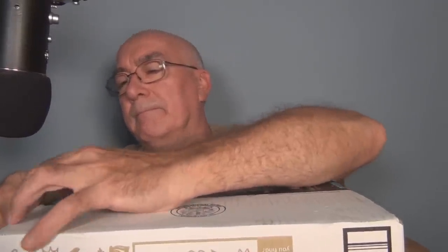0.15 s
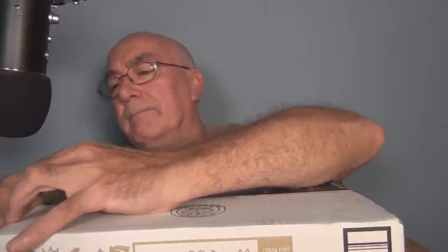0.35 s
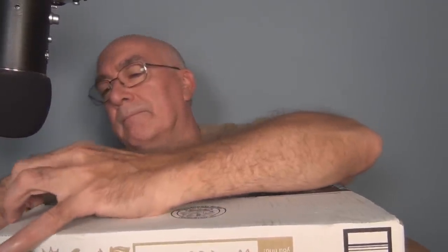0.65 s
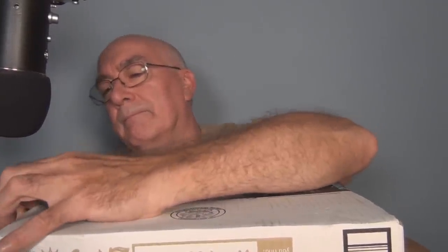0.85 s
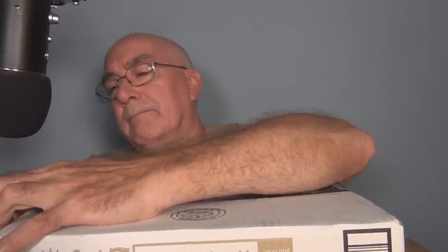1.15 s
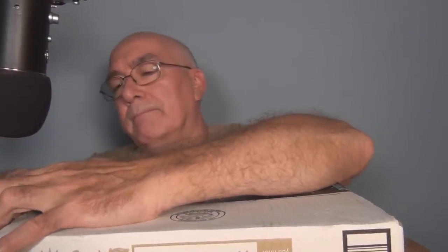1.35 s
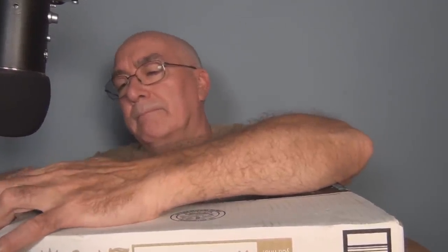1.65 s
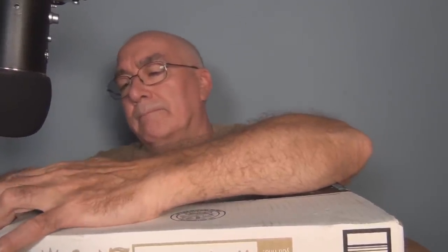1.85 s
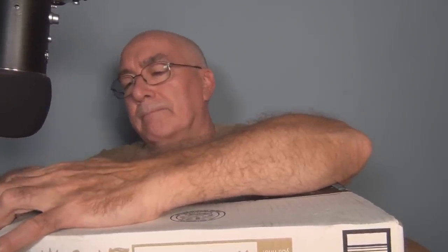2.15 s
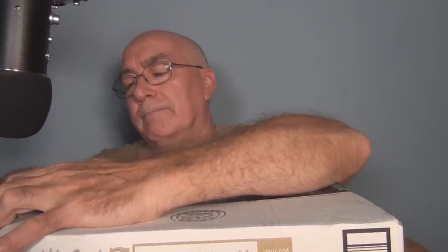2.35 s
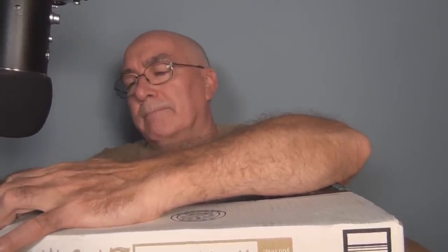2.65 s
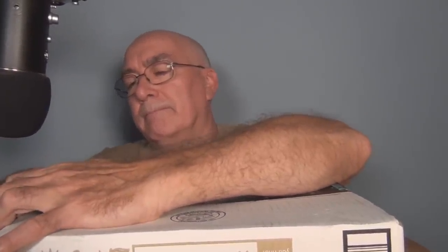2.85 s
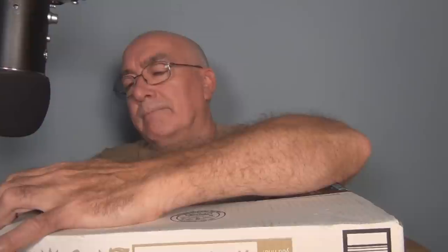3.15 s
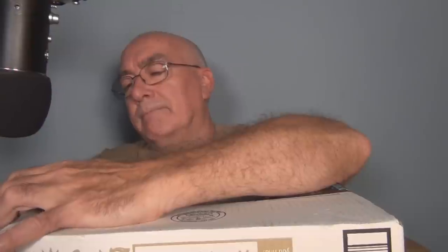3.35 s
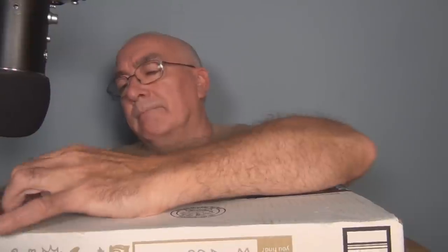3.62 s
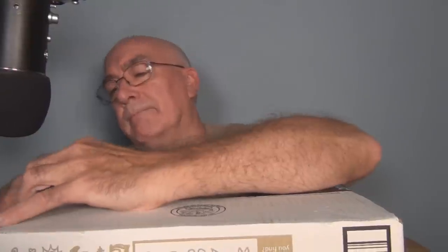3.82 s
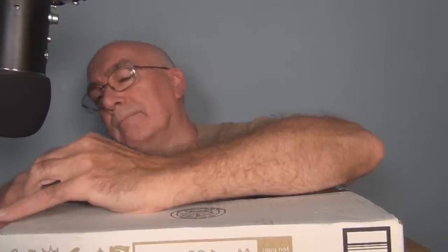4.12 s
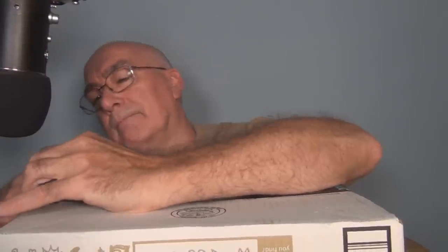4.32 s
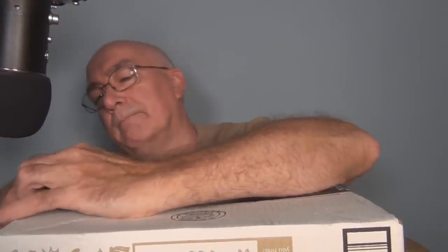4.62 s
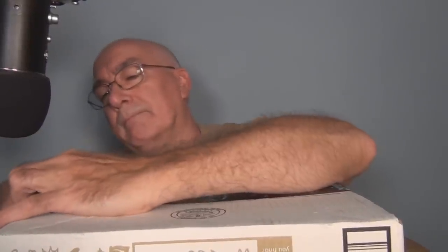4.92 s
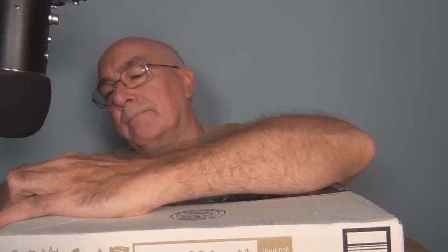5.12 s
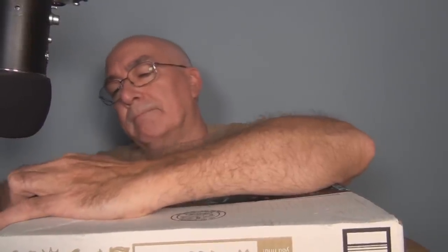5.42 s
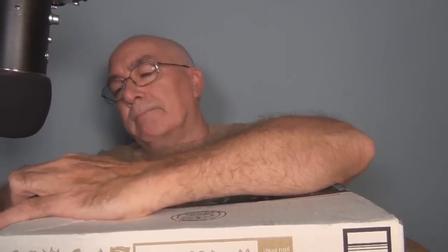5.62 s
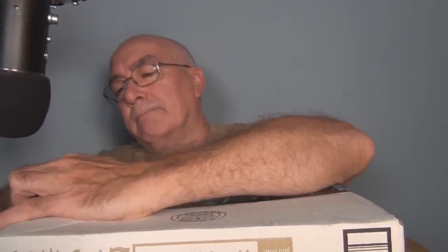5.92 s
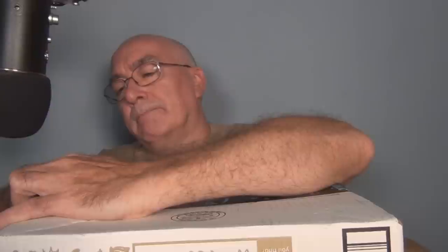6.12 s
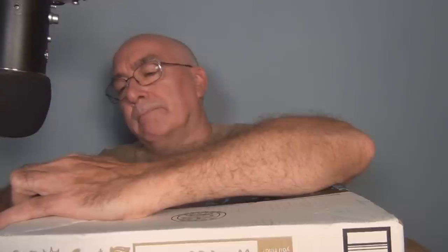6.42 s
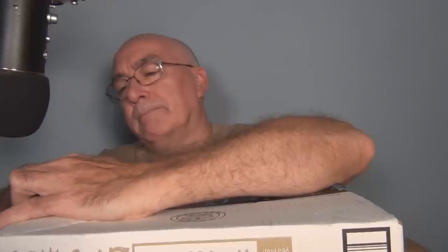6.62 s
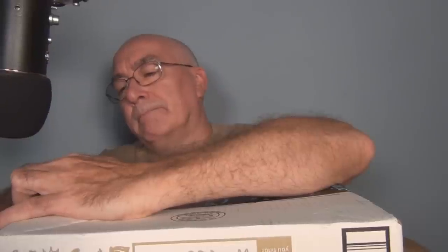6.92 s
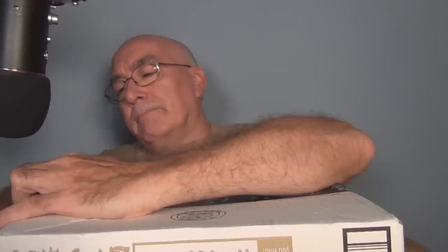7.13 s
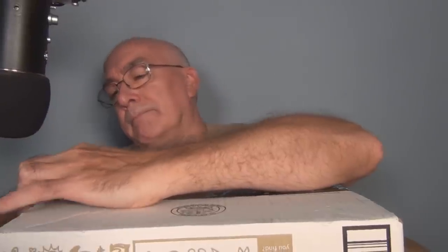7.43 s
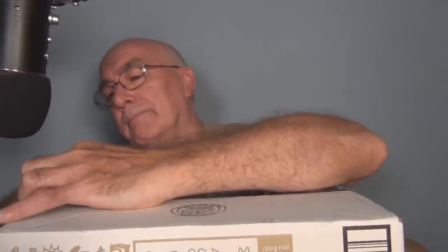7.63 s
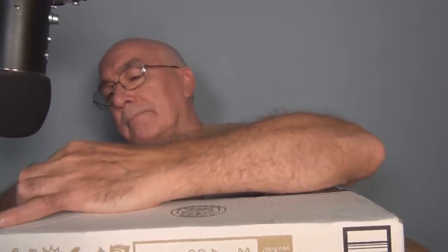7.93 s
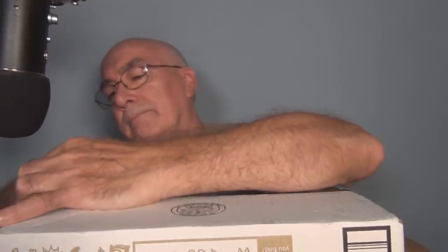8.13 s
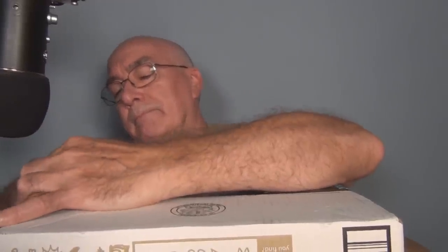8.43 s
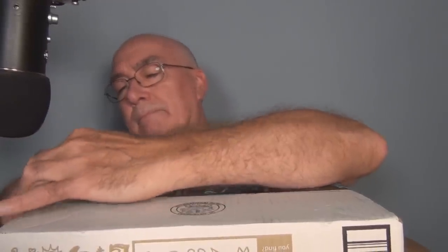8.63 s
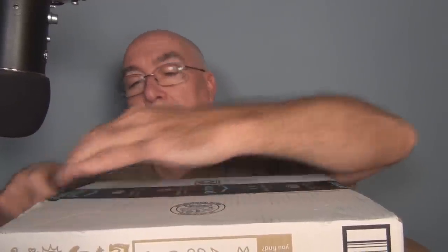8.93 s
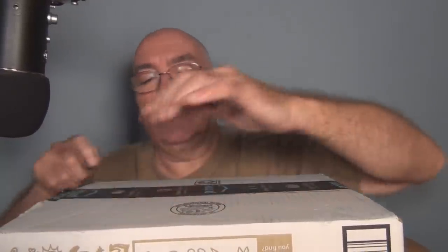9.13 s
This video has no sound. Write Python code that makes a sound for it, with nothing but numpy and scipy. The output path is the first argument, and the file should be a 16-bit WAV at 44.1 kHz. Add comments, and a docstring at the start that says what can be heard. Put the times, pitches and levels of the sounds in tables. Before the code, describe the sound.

Fingers tap and scratch lightly on a hollow cardboard box, until the lid creaks and buckles with one loud pop.

```python
"""A cardboard box, tapped and scratched by a hand, close to a microphone in a quiet room.
Finger knocks ring the hollow lid; nails tick, scrape and rasp on its paper liner; skin sticks
and slips in squeaks and judders; the resting forearm shifts and makes the box rumble.
Near the end the lid creaks harder and harder under the arm, then buckles with one loud pop."""
import sys
import numpy as np
from scipy import signal
from scipy.fft import rfft, irfft, next_fast_len
from scipy.io import wavfile

SR = 44100
rng = np.random.default_rng(int(sys.argv[2]) if len(sys.argv) > 2 else 0)


def transcribe(signal):
    """Save signal, clipped to [-1, 1], as a 16-bit WAV file at the path in sys.argv[1]."""
    frames = np.atleast_2d(signal).T
    limited = np.clip(frames, -1, 1)
    pcm = np.round(limited * 32767).astype(np.int16)
    wavfile.write(sys.argv[1], SR, pcm)


N = 408807
FIR_LEN = 4096
HZ = np.fft.rfftfreq(FIR_LEN, 1 / SR) + 1
BAND_LIMIT_HZ = 16300
POP_S, LIFT_OFF_S = 8.1443, 8.97

# room noise and microphone hiss: freq_hz, gain_db
FLOOR_EQ = [(22, 1), (50, -8), (105, -4), (170, -16.5), (260, -12), (600, -24), (1500, -29), (5000, -39.5),
            (15000, -42.5)]
# resonances of the box's air, lid and paper skin: freq_hz, width_hz, level_db
BOX_MODES = [(73.36,100,-2.5), (107,17,-3.5), (155.89,65,-5), (210,27,-3), (257,52,0), (320.86,29,-7.5),
             (405.2,38.686,0), (465.66,44,-6.5), (756,249.55,-11.5), (1010,520,-21), (1580,310,-22.5),
             (2050,180,-27), (2450,300,-23.5), (4010,260,-21.5), (6000,8800,-22.5)]
# resonances of the paper liner: freq_hz, width_hz, lift_db
LINER_MODES = [(1580, 190, 3.5), (2430, 87, 3), (2700, 110, 5), (3210, 230, 2.5), (5090, 250, 6.5),
               (6380, 450, 6.5), (7070, 390, 5), (9830, 720, 4.5), (12500, 610, 3)]
# finger strokes: peak_s, swell_s, fade_s, scrape_db, drag_db
FINGER_STROKES = [(0.11, 0.16, 0.44, -59.5, -54.5), (0.44, 0.13, 0.3, -60.5, -56),
                  (0.82, 0.08, 0.08, -58, -42.5), (1.099, 0.32, 0.21, -67, -43.5),
                  (1.43, 0.15, 0.17, -58, -42.5), (1.717, 0.10564, 0.12295, -49.5, -41.5),
                  (1.954, 0.13, 0.039, -52.5, -42), (2.16, 0.14, 0.059, -62.5, -48.5),
                  (2.488, 0.09, 0.043, -52, -48.5), (2.644, 0.041, 0.037, -44.5, -47),
                  (2.862, 0.0888, 0.11192, -56.5, -47.5), (3.023, 0.05, 0.025, -59.5, -44),
                  (3.229, 0.12, 0.18634, -51, -42), (3.41, 0.08054, 0.094, -53.5, -44),
                  (3.54, 0.066, 0.047, -53, -44.5), (3.678, 0.076, 0.098, -52.5, -41),
                  (3.92, 0.69, 0.079, -57.5, -73.5), (4.139, 0.034, 0.082, -58, -58.5),
                  (4.31, 0.05, 0.027, -60, -46.5), (4.41, 0.031, 0.1523, -59.5, -52),
                  (4.55, 0.05884, 0.075, -64, -42), (4.68, 0.076, 0.09, -55.5, -54.5),
                  (4.94, 0.14, 0.19, -61, -44.5), (5.14, 0.048, 0.18, -56, -45),
                  (5.341, 0.051, 0.031, -52.5, -42), (5.504, 0.095, 0.06, -46, -41.5),
                  (5.67, 0.065, 0.041, -55, -47.5), (5.801, 0.028, 0.0728, -46, -42),
                  (5.85, 0.062, 0.069, -42.5, -38.5), (6.177, 0.04112, 0.096, -48.5, -46),
                  (6.32, 0.095, 0.034, -51.5, -46), (6.44, 0.051, 0.11977, -51, -41),
                  (6.708, 0.089, 0.078, -42.5, -36), (6.87, 0.063, 0.0408, -58, -44.5),
                  (7.006, 0.04, 0.0535, -44.5, -38), (7.203, 0.026, 0.045, -50, -38.5),
                  (7.42, 0.32, 0.21, -59.5, -49), (7.83, 0.073, 0.11, -60.5, -43.5),
                  (8.12, 0.34, 0.9, -60, -48.5), (8.73, 0.023, 0.0674, -51, -46.5),
                  (8.8, 0.021, 0.033, -50.5, -43.5), (8.951, 0.082, 0.03, -52.5, -47.5)]
# nail on paper: freq_hz, gain_db
SCRAPE_EQ = [(300, -22.5), (660, 9), (1050, 7), (2550, 2), (3000, -0.5), (4000, -0.5), (5100, -2.5),
             (6500, -3), (8200, -1.5), (9900, -4.5), (11300, -5.5), (15000, -8)]
# force of dragging skin: freq_hz, gain_db
DRAG_EQ = [(50, -18), (130, 0.5), (280, -1), (400, -2), (540, 5.5), (800, -2.5), (1200, -2), (1600, 1),
           (2200, -8), (8000, -22)]
# forearm weight shifts: peak_s, swell_s, fade_s, level_db
ARM_SHIFTS = [(0.79, 0.09, 0.12, -35.5), (1.12, 0.19, 0.22, -44.5), (6.44, 0.045, 0.096, -43),
              (8.1, 0.19, 0.21, -34.5)]
# force of the shifting arm: freq_hz, gain_db
ARM_EQ = [(25, 9.5), (70, -5), (105, 6.5), (180, -6), (300, -21.5), (900, -27)]
# nail ticks: start_s, level_db, pitch_hz
NAIL_TICKS = [(1.9577, -19.5, 7613), (2.13, -29, 7258), (2.2426, -28.5, 7327), (2.3089, -28.5, 7240),
              (3.3938, -18, 9174), (4.963, -28.5, 5200), (5.1024, -18, 5000), (6.236, -26.5, 7492),
              (7.048, -19.5, 10400), (7.1385, -18, 10800), (7.1528, -24.5, 10900), (9.2082, -27, 5410)]
# finger knocks: start_s, force_db, weight_db, hardness_db, spot_hz
FINGER_KNOCKS = [(0.352, 4.5, -1, 2, 1110), (0.432, 0.5, -29, 8.5, 880), (0.57, 0, -12, 8, 799),
                 (0.629, 6.5, -6, 1, 1247), (0.652, -2, 20.5, 3, 251.8), (0.8192, 19.5, 3.5, 0.5, 855.9),
                 (0.89, 12, -14.5, -7.5, 1250), (0.996, -0.5, -11, 5, 899), (1.084, 13.5, -18, -4, 1185),
                 (1.203, 4.5, 1.5, 3.5, 799), (1.4392, 29, 2, 4.5, 258), (1.4584, 27, -3, -4, 300),
                 (1.6566, 13.5, 3, 5, 2900), (1.663, 24, -1, -6.5, 319.9), (2.42, 4.5, -1, 1, 373.1),
                 (3.205, 12.5, 3.5, 4.5, 2940), (3.248, 9, 7, -11, 268.5), (3.659, 15, -30, 4, 392.9),
                 (3.663, 18.5, 5, 9.5, 5300), (3.845, 7, 14, -0.5, 338), (4.119, -2.5, 7, 8.5, 366),
                 (4.251, 0, -17, -1, 480.5), (4.402, 5.5, 4, -0.5, 1000), (4.544, 1.5, 14, 3, 420),
                 (4.771, 10, -17, -4.5, 620), (4.962, 5.5, -2.5, 7, 465), (5.132, 5.5, 13.5, 0, 699),
                 (7.371, 4, 9, 8.5, 1605), (7.439, 10.5, -5, 8, 497), (7.482, 0, 14, 4.5, 250.7),
                 (8.371, -0.5, 0, -15, 447), (8.73, 4, 8, 12.5, 2720), (8.753, 6, 2, 3, 286)]
# lone creaks as the hand settles: start_s
LIGHT_CREAKS_S = [0.465, 0.497, 0.595, 0.728, 0.742, 0.9, 0.913, 5.171, 7.92]
# creaks leading to the pop: start_s
LOADED_CREAKS_S = [7.973, 8.006, 8.022, 8.039, 8.062, 8.073, 8.097, 8.116]
# force of a creak: freq_hz, gain_db
CREAK_EQ = [(70, 9.5), (150, 7), (300, 1.5), (420, 3.5), (600, 0), (1200, -3), (1620, 5), (2300, -12.5),
            (6300, -14)]
# pushes with the heel of the hand: start_s, rise_s, level_db, pitch_hz
HEEL_THUMPS = [(0.753, 0.023, -37, 71), (4.404, .009, -31.5, 77), (8.752, 0.0034, -28, 72)]
# skin squeaks: centre_s, length_s, level_db, pitch_hz
SKIN_SQUEAKS = [(1.731, 0.044, -47, 2550), (4.883, 0.06877, -50, 3200), (5.106, 0.043, -47.5, 2070),
                (6.535, 0.11, -50.5, 2060), (8.804, 0.02162, -45.5, 2500)]
# fingertip judders: centre_s, length_s, level_db, first_hz, last_hz, lowpass_hz
FINGER_JUDDERS = [(2.643, 0.088, -43.5, 241.4, 272, 150), (2.819, 0.059, -40.5, 214, 301, 100),
                  (6.625, 0.083, -41.5, 199, 399, 1900)]
# nail digging in: peak_s, swell_s, fade_s, level_db
NAIL_RASPS = [(5.509, .004, 0.014, -32.5), (5.516, 0.0043, 0.022, -31.5), (5.831, 0.0046, 0.011, -29.5),
              (5.839, 0.0055, 0.027, -29.5), (6.671, .004, .007, -33), (6.687, 0.0047, 0.0098, -36.5),
              (6.707, .005, 0.016, -32.5)]
# chattering nail: freq_hz, gain_db
RASP_EQ = [(50, -1), (140, 19.5), (250, 18.5), (330, 5), (430, 12), (660, 16), (1000, 0.5), (1600, 4),
           (4000, -9), (10000, -9.5), (15000, -14)]
# force of the buckling lid: freq_hz, gain_db
POP_EQ = [(80, 36), (160, 33), (255, 43), (400, 35.5), (750, 46.9), (1000, 51.2), (1200, 38), (1600, 51.3),
          (2000, 41.4), (2600, 44.8), (3900, 30), (5200, 37.6), (7000, 39.5), (8500, 31), (12000, 29)]
# reverb decay: freq_hz, t60_s
ROOM_DECAY = [(100, 0.36), (500, 0.22), (6000, 0.33), (10000, 0.06), (15000, 0.2)]
# reverb colour: freq_hz, gain_db
ROOM_EQ = [(80, -15.5), (250, -18.5), (620, -12), (950, -16.5), (1300, -12), (1650, -13), (2200, -11),
           (6000, -16), (14000, -14)]


def amp(db):
    """Decibels to amplitude."""
    return 10 ** (np.asarray(db) / 20)


def unit_rms(x):
    """Scale to rms 1."""
    return x / np.sqrt(np.mean(x ** 2) + 1e-20)


def curve(points, hz=HZ):
    """Interpolate (freq_hz, value) points over log frequency."""
    freq_hz, value = np.transpose(points)
    return np.interp(np.log(hz + 1), np.log(freq_hz), value)


def add(mix, start_s, sound):
    """Mix a sound in at start_s."""
    part = mix[max(round(start_s * SR), 0):][:len(sound)]
    part += sound[:len(part)]


def impulse_response(eq_db):
    """Minimum-phase response of a spectrum."""
    log_gain = np.log(amp(np.maximum(eq_db, -100)))
    mirrored = np.r_[log_gain, log_gain[-2:0:-1]]
    return np.fft.ifft(np.exp(np.conj(signal.hilbert(mirrored)))).real


def coloured(x, eq_db, band_hz):
    """Filter by eq_db; scale to rms 1 within band_hz."""
    y = signal.oaconvolve(x, impulse_response(eq_db))[:N]
    in_band = signal.sosfilt(signal.butter(4, band_hz, "bandpass", fs=SR, output="sos"), y)
    return y / in_band.std()


def wander(rate_hz):
    """Random drift of rms 1."""
    knots = rng.standard_normal(N // 32)
    return unit_rms(np.interp(np.arange(N) * rate_hz / SR, np.arange(len(knots)), knots))


def box_db(damping=1):
    """Box resonances; pressing the lid damps and widens them."""
    power = sum(amp(db) ** 2 / (1 + ((HZ ** 2 - hz ** 2) / (HZ * width_hz * damping)) ** 2) ** 1.5
                for hz, width_hz, db in BOX_MODES)
    return 10 * np.log10(power)


def liner_db(detune=0, spread_db=0):
    """Lift from the liner's resonances, scattered by the place touched."""
    scatter = rng.standard_normal((len(LINER_MODES), 2))
    power = 0
    for (hz, width_hz, db), (pitch, strength) in zip(LINER_MODES, scatter):
        offset = 2 * (HZ - hz * (1 + detune * pitch)) / width_hz
        power += amp(db + spread_db * strength) ** 2 / (1 + offset ** 2) ** 1.5
    return 10 * np.log10(1 + power)


def friction(slips_per_s, spread_db, grip_db, grip_hz):
    """Paper fibres catch and release: uneven slips, clumped by a wavering grip."""
    sizes = amp(spread_db * np.minimum(rng.exponential(1, N), 5)) * rng.choice([-1, 1], N)
    slipping = rng.random(N) < slips_per_s / SR
    return sizes * slipping * amp(grip_db * wander(grip_hz))


def motion_gain(moves, rest_db, drop_db=17.5, roundness=1.62):
    """Envelope of moves (peak_s, swell_s, fade_s, level_db) over a resting stir until lift-off."""
    t = np.arange(N) / SR
    power = amp(rest_db) ** 2 * np.clip((LIFT_OFF_S - t) * 10, 0, 1)
    for peak_s, swell_s, fade_s, level_db in moves:
        near = abs(t - peak_s) < 2 * max(swell_s, fade_s)
        distance = np.maximum((peak_s - t[near]) / swell_s, (t[near] - peak_s) / fade_s)
        power[near] += amp(level_db - drop_db * distance ** roundness) ** 2
    return np.sqrt(power)


def background(floor_db=-58, sway_db=-61, whine_db=-80):
    """Room rumble, hiss, electrical whine, and the box swaying until lift-off."""
    t = np.arange(N) / SR
    floor = coloured(rng.standard_normal(N), curve(FLOOR_EQ), (20, 16000))
    sway_eq = [(12, -12), (25, 0), (45, 0), (120, -25), (600, -70)]
    sway = coloured(rng.standard_normal(N), curve(sway_eq), (20, 60))
    sway *= np.clip((LIFT_OFF_S - t) * 10, 0, 1)
    whine = np.sin(2 * np.pi * 15626 * t) + np.sin(2 * np.pi * 15679 * t)
    return amp(floor_db) * floor + amp(sway_db) * sway + amp(whine_db) * whine


def nail_scrape(catch_db=18, catches_per_s=22, places=5, glide_hz=7):
    """Fine slips and sharper catches ring the liner; the nail glides between differently tuned places."""
    out, power = np.zeros(N), np.zeros(N)
    for _ in range(places):
        slips = friction(slips_per_s=8300, spread_db=4, grip_db=3.5, grip_hz=169.85)
        catches = (rng.random(N) < catches_per_s / SR) * rng.uniform(-0.87, 1, N)
        force = unit_rms(slips) + 2 * amp(catch_db) * catches
        eq_db = curve(SCRAPE_EQ) + liner_db(detune=0.035, spread_db=4.5)
        nearness = np.exp(2 * wander(glide_hz))
        out += nearness * coloured(force, eq_db, (3000, 14000))
        power += nearness ** 2
    return out / np.sqrt(power)


def strokes(drag_trim_db=-1):
    """Nails hiss over the paper while coarser slips of the skin shake the box."""
    slips = friction(slips_per_s=900, spread_db=2.5, grip_db=3, grip_hz=69.24)
    drag = coloured(slips, box_db(damping=1.2) + curve(DRAG_EQ), (220, 1200))
    nail_gain = motion_gain([(*timing, db) for *timing, db, _ in FINGER_STROKES], rest_db=-80)
    skin_gain = motion_gain([(*timing, db) for *timing, _, db in FINGER_STROKES], rest_db=-60.5)
    return nail_scrape() * nail_gain + amp(drag_trim_db) * drag * skin_gain


def forearm(trim_db=0.5, coupling_db=-7):
    """Soft slips of the arm rumble the box at each shift, and a little with each stroke."""
    slips = friction(slips_per_s=490, spread_db=0.5, grip_db=3.5, grip_hz=15)
    rumble = coloured(slips, box_db() + curve(ARM_EQ), (55, 200))
    pulls = [(*timing, drag_db + coupling_db) for *timing, _, drag_db in FINGER_STROKES]
    return amp(trim_db) * rumble * motion_gain(ARM_SHIFTS + pulls, rest_db=-58)


def crackle_rows(per_s=9, level_db=-41.5, spread_db=3.5, pitch_hz=7500):
    """Stray paper crackles under the hand until lift-off: start_s, level_db, pitch_hz."""
    gap, size, pitch = rng.random(size=(300, 3)).T
    starts_s = np.cumsum(-np.log(1 - gap)) / per_s
    rows = zip(starts_s, level_db + spread_db * (2 * size - 1), pitch_hz * 2 ** (pitch - 0.5))
    return [row for row in rows if row[0] < LIFT_OFF_S]


def ticks(trim_db=-2, flutter_s=0.0024, flutter_gain=0.26567):
    """Nail ticks and paper crackles, too light to move the lid: a click and flutter in the treble."""
    out, t = np.zeros(N), np.arange(FIR_LEN // 8) / SR
    for start_s, level_db, hz in NAIL_TICKS + crackle_rows():
        force = flutter_gain * rng.standard_normal(len(t)) * np.exp(-t / flutter_s)
        force[0] = 1
        hump_db = curve([(hz / 20, -22), (hz / 3, -13), (hz, 0), (hz * 2, -9)])
        tick = signal.fftconvolve(force, impulse_response(hump_db))
        add(out, start_s, amp(level_db + trim_db) * tick / abs(tick).max())
    return out


def impact(eq_db, dispersion_s, crush_s, crush_hz):
    """One blow: crushed paper crackles above crush_hz, and the bass arrives late."""
    crush = rng.standard_normal(FIR_LEN) * np.exp(-np.arange(FIR_LEN) / SR / crush_s)
    crush_share = HZ ** 2 / (HZ ** 2 + crush_hz ** 2)
    force = np.sqrt(1 - crush_share) + np.sqrt(crush_share) * rfft(crush / np.linalg.norm(crush))
    # bending-wave speed goes with the root of frequency
    lag_s = dispersion_s * (np.sqrt(1000 / (HZ + 150)) - np.sqrt(1000 / HZ[-1]))
    delay = np.exp(-2j * np.pi * np.cumsum(lag_s) * SR / FIR_LEN)
    return irfft(rfft(impulse_response(eq_db)) * force * delay)


def tap(eq_db, force_db):
    """Impact coloured at random by its place on the lid; more force crushes the paper for longer."""
    log_hz = np.linspace(np.log(100), np.log(BAND_LIMIT_HZ), 48)
    place_db = np.interp(np.log(HZ), log_hz, rng.standard_normal(48))
    crush_s = 0.0018 * amp(0.42 * force_db)
    return impact(eq_db + place_db + force_db, dispersion_s=0.0018, crush_s=crush_s, crush_hz=1640)


def knocks(spot_boost_db=8, spot_octaves=0.70305):
    """Fingers ring the box: weight adds bass, hardness adds snap, each spot favours its own pitch."""
    out, body_db = np.zeros(N), box_db()
    for start_s, force_db, weight_db, hardness_db, spot_hz in FINGER_KNOCKS:
        snap_db = -13.5 + 1.32 * hardness_db
        contact_db = curve([(70, weight_db - 5), (105, weight_db - 4.5), (155, weight_db), (300, 0),
                            (600, 0), (1700, hardness_db), (2500, hardness_db), (6000, snap_db)])
        spot_db = spot_boost_db * np.exp(-(np.log2(HZ / spot_hz) / spot_octaves) ** 2)
        add(out, start_s, tap(body_db + contact_db + spot_db, force_db))
    return out


def creaks(light_db=1.5, at_pop_db=17.5, growth_db_per_s=47.5):
    """The loaded lid slips: lone light creaks, then a run that grows until it gives way."""
    out, eq_db = np.zeros(N), box_db() + curve(CREAK_EQ)
    low_cut_db = 10 * np.log10(HZ ** 2 / (HZ ** 2 + 300 ** 2))
    for start_s in LIGHT_CREAKS_S:
        add(out, start_s, tap(eq_db + low_cut_db, light_db))
    for start_s in LOADED_CREAKS_S:
        add(out, start_s, tap(eq_db, at_pop_db - growth_db_per_s * (POP_S - start_s)))
    return out


def thumps():
    """The whole lid swings a few times under a soft push."""
    out, t = np.zeros(N), np.arange(2 * FIR_LEN) / SR
    for start_s, rise_s, level_db, pitch_hz in HEEL_THUMPS:
        envelope = t / rise_s * np.exp(1 - t / rise_s)
        add(out, start_s, amp(level_db) * envelope * np.sin(2 * np.pi * pitch_hz * t))
    return out


def squeaks(q=1.5):
    """Uneven stick-slip of skin gathers round one pitch in a soft, hoarse squeak."""
    out = np.zeros(N)
    for centre_s, length_s, level_db, pitch_hz in SKIN_SQUEAKS:
        slips = rng.standard_normal(SR)[:int(length_s * SR) + 256]
        b, a = signal.iirpeak(pitch_hz, q, fs=SR)
        tone = signal.lfilter(b, a, signal.lfilter(b, a, slips))
        squeak = unit_rms(tone * np.hanning(len(tone))) / np.sqrt(2)
        add(out, centre_s - length_s / 2, amp(level_db) * squeak)
    return out


def judders(jitter=0.1, jitter_hz=194):
    """Near-regular slips nudge the pressed lid, quickening as the fingertip gathers speed."""
    out, body_db = np.zeros(N), box_db(damping=1.6)
    for centre_s, length_s, level_db, first_hz, last_hz, lowpass_hz in FINGER_JUDDERS:
        n = int(length_s * SR)
        rate_hz = np.linspace(first_hz, last_hz, n) * (1 + jitter * wander(jitter_hz)[:n])
        pulses = np.diff(np.floor(np.cumsum(rate_hz) / SR), prepend=0)
        slips = pulses * np.hanning(n) * rng.uniform(0.46, 1, N)[:n]
        band_db = 20 * np.log10(HZ ** 2 / (HZ ** 2 + first_hz ** 2) / (1 + (HZ / lowpass_hz) ** 2))
        judder = signal.fftconvolve(slips, impulse_response(body_db + band_db))
        add(out, centre_s - length_s / 2, amp(level_db) * judder / judder[:n].std())
    return out


def rasps(bite_db=41.5):
    """A nail bites with a knock and chatters; hard, dense slips shake liner and lid."""
    slips = friction(slips_per_s=3000, spread_db=2, grip_db=3.5, grip_hz=400)
    chatter = coloured(slips, curve(RASP_EQ) + liner_db(), (500, 8000))
    out = chatter * motion_gain(NAIL_RASPS, rest_db=-np.inf)
    knock_eq_db = box_db() + curve([(300, -1), (1600, 5.5), (6000, -6.5)])
    for peak_s, _, _, level_db in NAIL_RASPS:
        add(out, peak_s, tap(knock_eq_db, level_db + bite_db))
    return out


def pop():
    """The pressed lid buckles all at once: a short, hollow crack."""
    out, eq_db = np.zeros(N), box_db(damping=1.8) + curve(POP_EQ)
    add(out, POP_S, impact(eq_db, dispersion_s=0.003, crush_s=0.0015, crush_hz=8000))
    return out


def room(x, predelay_s=0.0063):
    """Dense reflections, each band decaying at its own rate."""
    hz, t, noise = signal.stft(rng.standard_normal(SR), SR, nperseg=256)
    decay = amp(-60 * t / curve(ROOM_DECAY, hz)[:, None])
    decay /= np.sqrt(SR * np.mean(decay ** 2, axis=1, keepdims=True))
    band_gain = amp(curve(ROOM_EQ, hz))[:, None]
    tail = signal.istft(noise * decay * band_gain, SR, nperseg=256)[1]
    return signal.oaconvolve(x, np.r_[np.zeros(round(predelay_s * SR)), tail])[:N]


def scene(side_db=-16, side_hiss_db=-86):
    """Box and room at one stereo microphone; the right channel's treble trails by a sample."""
    box = knocks() + creaks() + pop() + ticks() + strokes()
    box += rasps() + judders() + squeaks() + thumps() + forearm()
    mid = box + room(box) + background()
    treble = np.diff(box, prepend=0)
    side = amp(side_db) * room(treble) + amp(side_hiss_db) * rng.standard_normal(N)
    fft_len = next_fast_len(N)
    hz = np.fft.rfftfreq(fft_len, 1 / SR)
    lag_s = hz ** 2 / (hz ** 2 + 500 ** 2) / SR
    right = irfft(rfft(mid - side, fft_len) * np.exp(-2j * np.pi * hz * lag_s), fft_len)[:N]
    return np.array([mid + side, right])


def record(dry):
    """Soft clip where the pop overloads the input, then the band limit."""
    clipped = dry / (1 + dry ** 8) ** (1 / 8)
    lowpass = signal.firwin(255, BAND_LIMIT_HZ, window=("kaiser", 8), fs=SR)
    return signal.oaconvolve(clipped, lowpass[None], "same")


dry = scene()
out = record(dry)
transcribe(out)
```